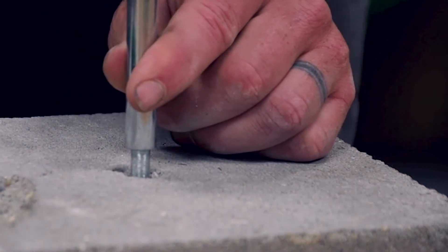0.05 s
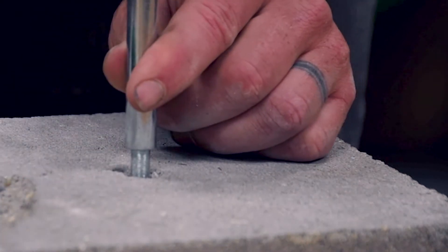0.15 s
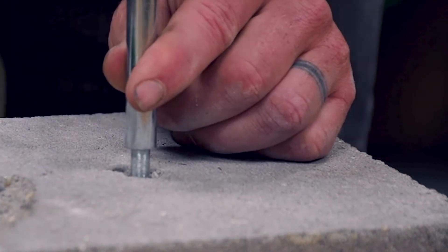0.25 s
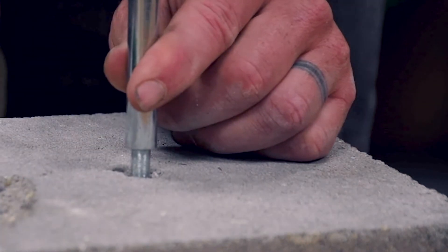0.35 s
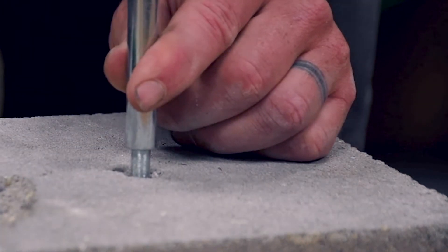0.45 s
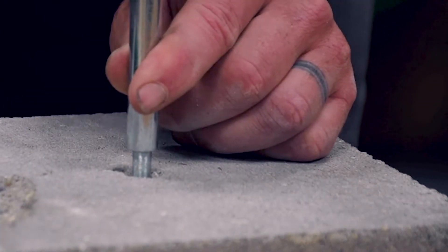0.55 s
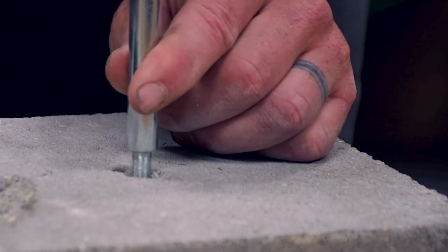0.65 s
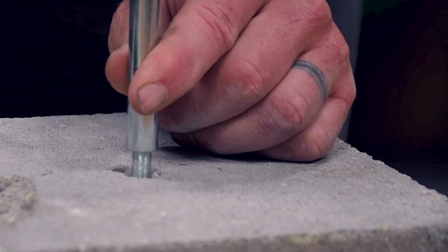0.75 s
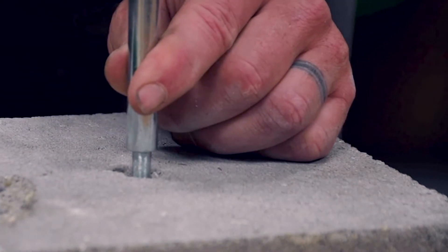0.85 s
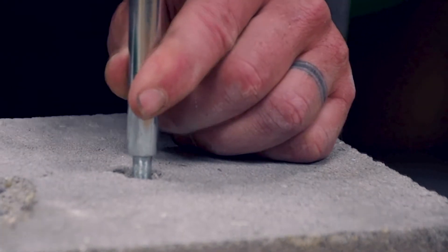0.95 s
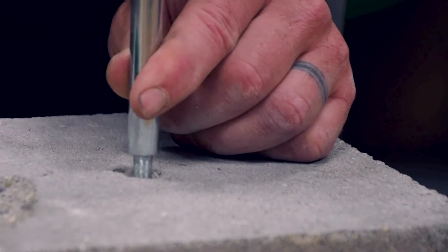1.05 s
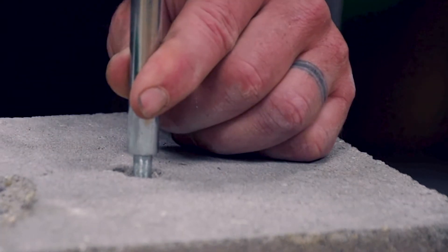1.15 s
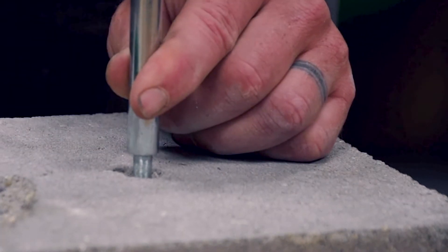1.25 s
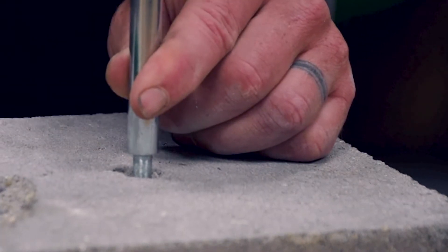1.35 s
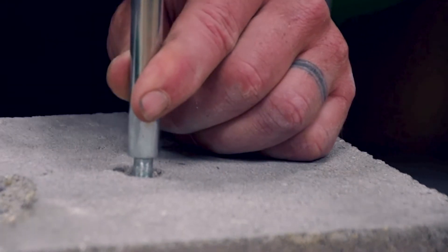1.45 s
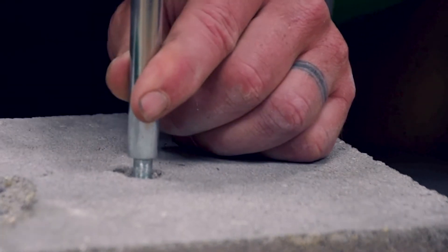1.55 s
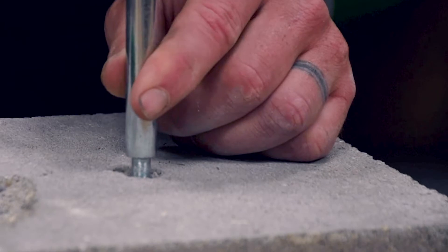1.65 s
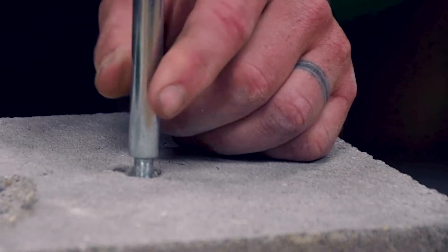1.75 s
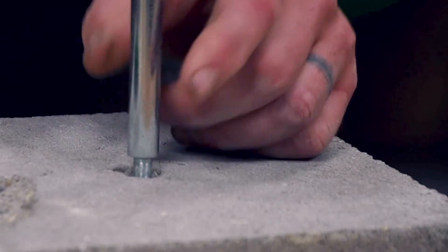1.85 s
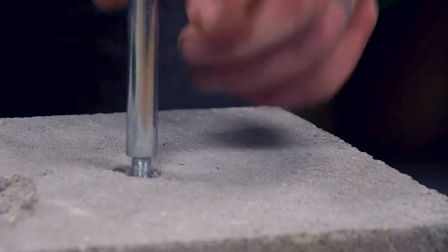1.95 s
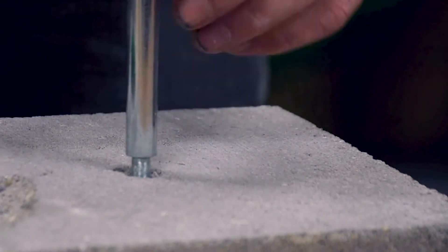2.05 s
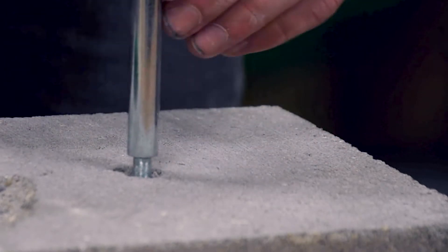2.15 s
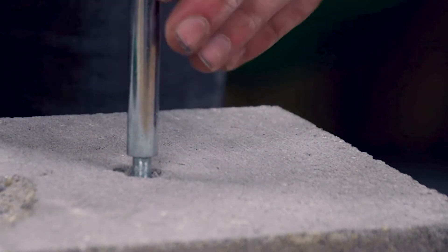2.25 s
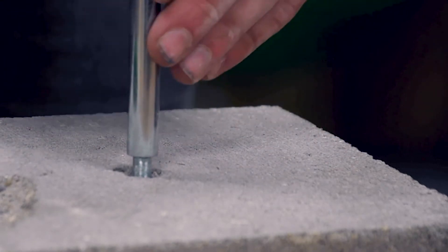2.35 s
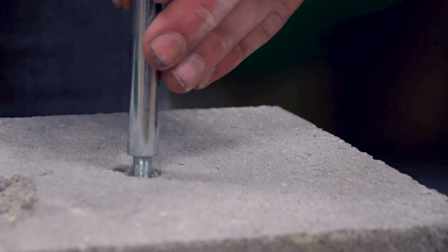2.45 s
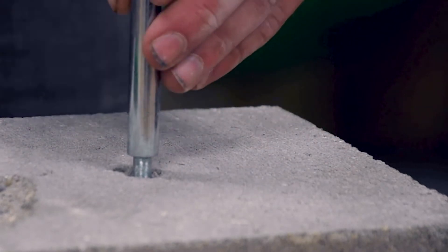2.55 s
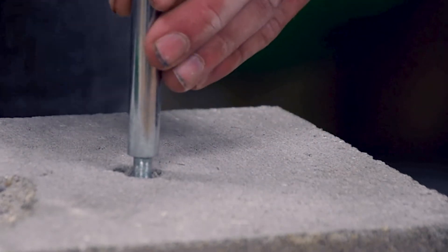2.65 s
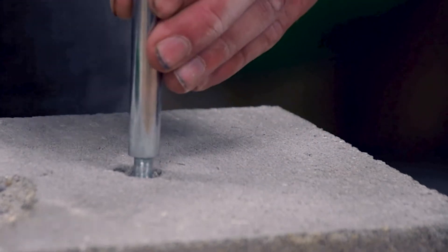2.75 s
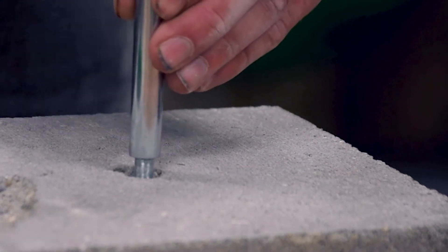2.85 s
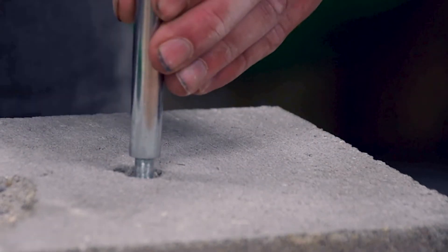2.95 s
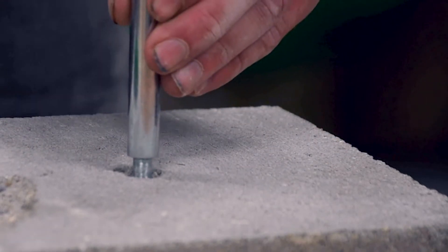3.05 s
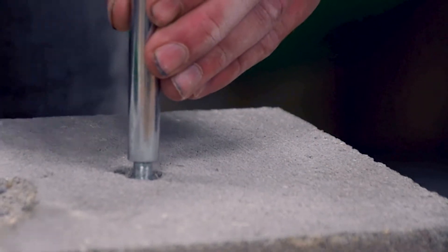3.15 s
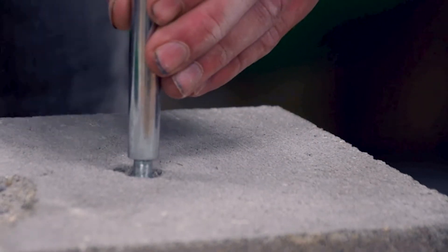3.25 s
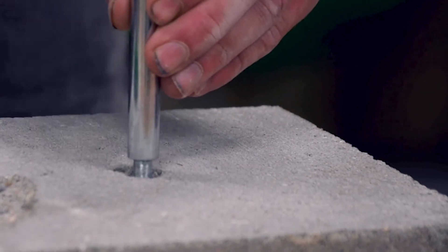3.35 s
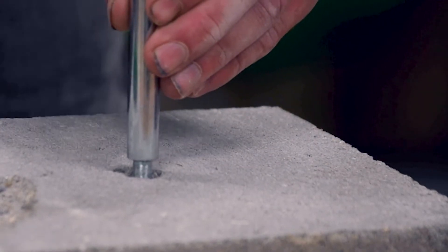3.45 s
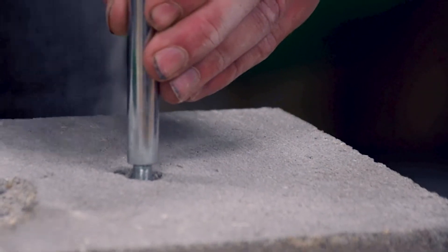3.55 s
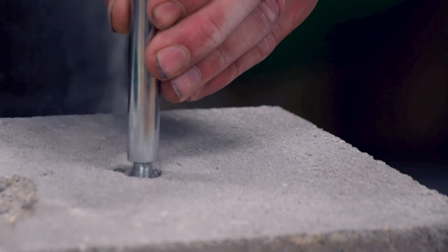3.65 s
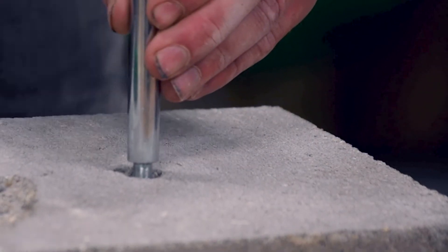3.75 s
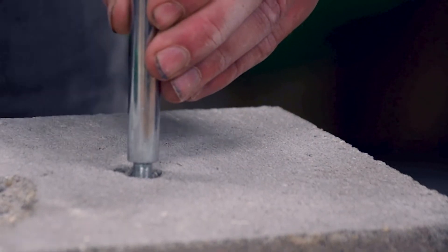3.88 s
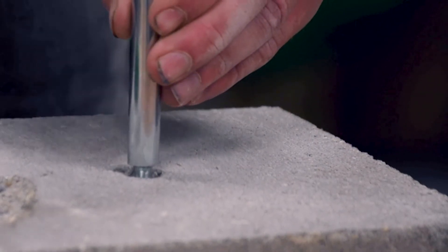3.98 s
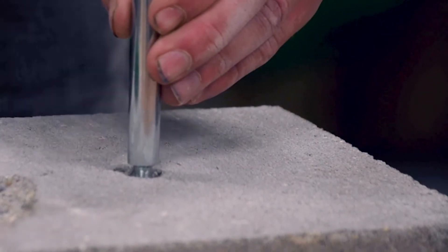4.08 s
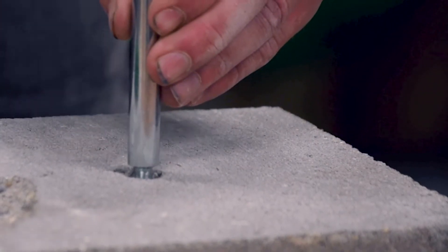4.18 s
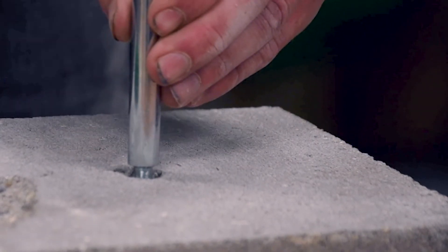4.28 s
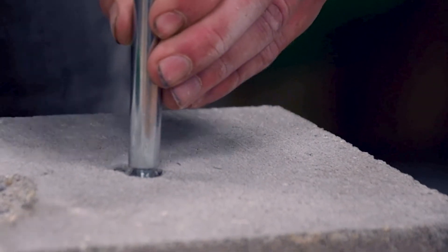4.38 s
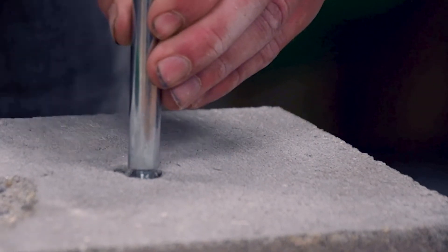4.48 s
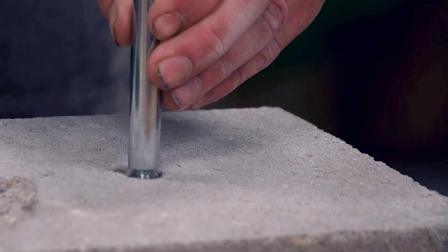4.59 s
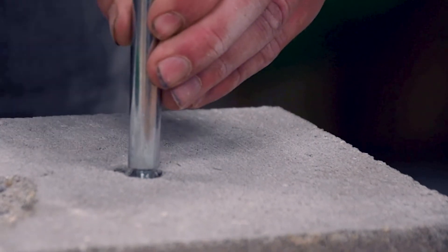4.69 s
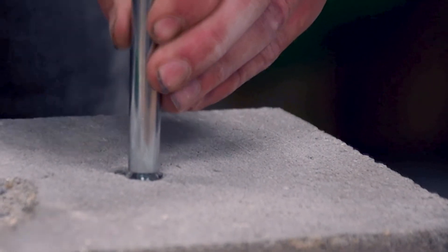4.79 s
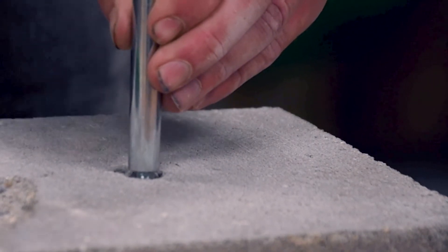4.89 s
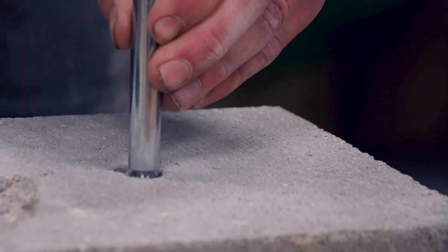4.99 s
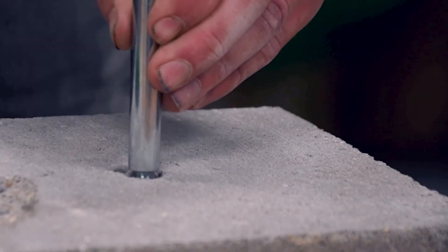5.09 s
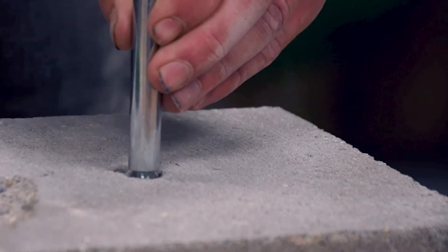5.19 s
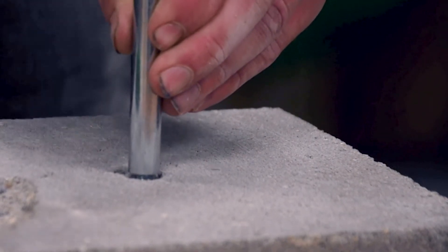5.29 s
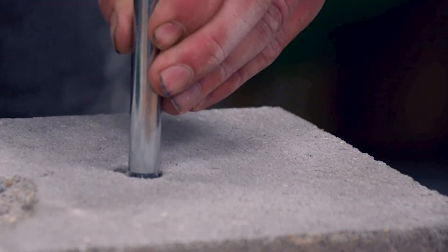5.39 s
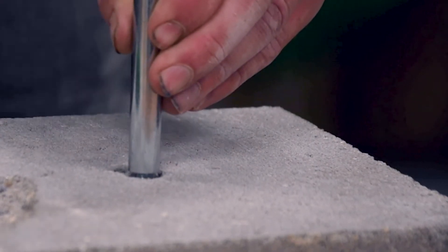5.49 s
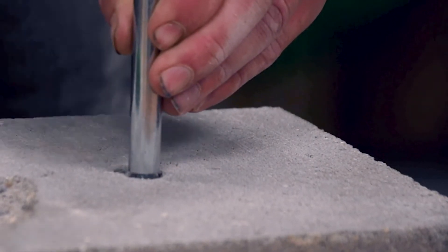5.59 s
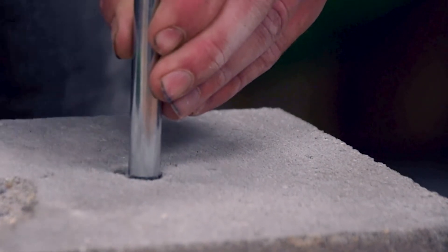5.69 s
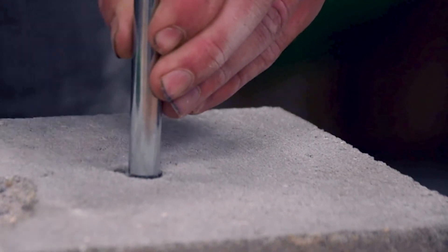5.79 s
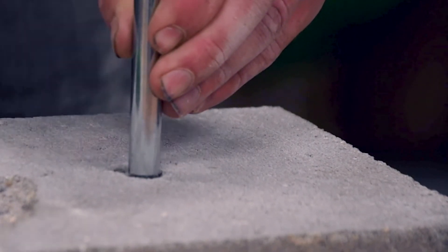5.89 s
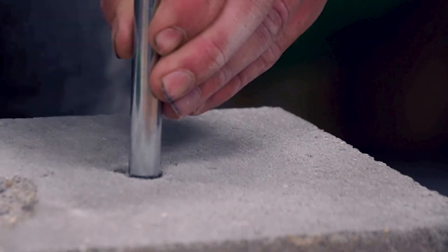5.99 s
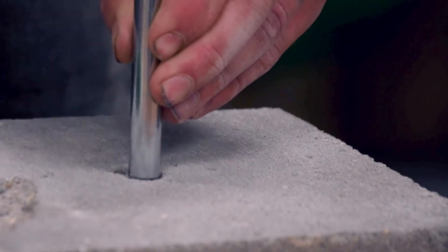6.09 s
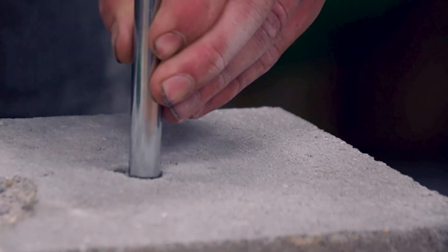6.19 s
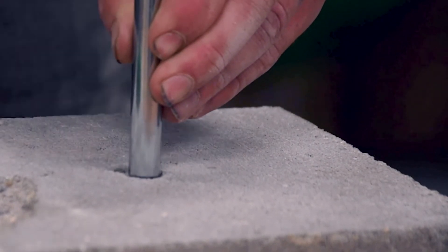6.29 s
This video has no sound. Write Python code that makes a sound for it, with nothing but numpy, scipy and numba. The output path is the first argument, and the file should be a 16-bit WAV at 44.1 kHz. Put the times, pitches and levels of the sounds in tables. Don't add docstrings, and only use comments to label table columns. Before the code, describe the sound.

A quiet workshop with low ventilation rumble and slight hiss; a sleeve rustles softly at the start. At 0.55 s a hammer taps a steel rod lightly, thin and clinking, then strikes more firmly at 0.99 and 1.43 s. Each blow is an instant broadband crack with a short, damped steel ring around 5 to 6 kHz, plus a woody-dull thud of concrete and bench, fading into a half-second room tail. From 1.75 to 2.6 s the hand shifts: faint cloth rustle, tiny high squeaks of fingers on metal, a clear small tick at 2.45 s. Hammering resumes at 2.75 s with a slightly off-centre, clankier blow, then continues at 3.18, 3.58, 4.0, 4.38, 4.82, 5.24, 5.64 and 6.05 s, strong and even. From 4.8 s blows sound tighter and more solid as the anchor beds in. Close stereo microphones, peaks flattened by limiting; the last echo dies away.

```python
import sys
import numpy as np
from scipy import signal
from scipy.fft import rfft, irfft, next_fast_len
from scipy.io import wavfile
from scipy.ndimage import uniform_filter1d, map_coordinates
from numba import njit

SR = 44100
rng = np.random.default_rng(int(sys.argv[2]) if len(sys.argv) > 2 else 0)


def inscribe(sig):
    pcm = np.round(np.clip(np.atleast_2d(sig).T, -1, 1) * 32767)
    wavfile.write(sys.argv[1], SR, pcm.astype(np.int16))


def rack_gain(trim_db):
    fader = np.asarray(trim_db, float)
    return 10 ** (fader / 20)


N = 279094

# start in seconds, strength in dB over the limiter ceiling, drive from -1 (tap)
BLOWS = [(0.5459, 13, -0.92, -0.44, 0.13), (0.9894, 16, -0.15, -0.069, 0.56),
         (1.4294, 19.5, 0.077, -0.084, 0.63), (2.7538, 15, -0.13, 1.0, 0.15),
         (3.1827, 17.5, 0.48, 0.04, 0.7), (3.5816, 20.5, 0.26, -0.13, 0.58), (3.995, 21, 0.15, -0.34, 0.5),
         (4.3777, 19, 0.41, -0.068, 0.39), (4.8247, 19.5, 0.071, -0.16, -0.96),
         (5.2426, 22, -0.056, -0.21, -0.95), (5.6449, 22, 0.16, 0.026, -0.73),
         (6.0459, 21, 0.26, 0.087, -0.74)]
# centre in Hz, width in Hz.
STEEL_MODES = [(2970, 390), (5068, 180), (5365, 144), (6670, 130), (7900, 525), (8450, 790), (9620, 580),
               (11700, 370), (12200, 60), (13700, 60),
               (1858, 190), (3460, 200), (4220, 890), (6100, 570), (7020, 170), (8940, 400), (5440, 370)]
# level in dB, dB per drive, dB per aim, dB per play.
STEEL_SHARES = [(-22.0, -0.5, 5.5, 6), (-14.0, 10, -13, -0.5), (-11.5, 4.5, 8.5, -10), (-15, -2.5, 9.5, -2),
                (-17, 3.5, 2, 13), (-13, -0.5, -4.5, 2), (-20, -5, 9, 0), (-21.5, -1.5, -3.5, 1),
                (-26, 8.5, -8, 0.5), (-34.5, 1.5, 8.5, -4)]
# level in dB, dB per drive, dB per aim, dB per play.
MORE_STEEL_SHARES = [(-28, 7, 4, -2), (-25.0, 4.0, 3, 2.5), (-25.5, -1.5, 5.5, 4), (-20.5, -2, 6.5, 0.5),
                     (-22.0, -4.5, 6, 0.5), (-26, 5.5, 1.5, -0.5), (-19.5, 0.5, 3, 3.5)]
# level in dB, dB per drive, dB per aim, dB per play.
PART_SHARES = [
    (-10.5, 9.5, 4, -2.5),
    (-26.0, 5.5, 0.5, -2.5),
    (-32.5, 13.5, -2.5, 0),
    (-44.5, 11.5, -1, -3),
    (-27.5, -2.5, -4, 7.0),
    (-20.5, 17, 5, -5.5),
    (-32, 7, -3.5, 0.0),
    (-25, -0.5, 9, 3),
    (-17, -3, 1, 4.5),
]
# frequency in Hz, level in dB.
THUD = [(25, -37.5), (70, -20), (110, -4), (200, -8.5), (350, 3.5), (600, -1), (900, -10.5), (1400, -25),
        (3000, -37.5)]
# frequency in Hz, level in dB.
KNOCK = [(400, -30.5), (750, 1), (1200, -5), (1700, -13.5), (3000, -42)]
# frequency in Hz, level in dB.
CRACK = [(500, 0), (1200, -0.5), (2300, -0.5), (3500, -1.5), (5000, 6.5), (7000, -2), (9000, -6),
         (10200, -27)]
# frequency in Hz, level in dB.
SHEEN = [(9000, -54), (10000, -5), (12400, 8.5), (13000, -36)]
# frequency in Hz, level in dB.
AIR = [(12000, -31.5), (12800, 1), (14500, 8), (15700, 3), (16900, -21.5)]
# centre in Hz, width in Hz.
CONTACT_MODES = [
    (13900, 3200),
    (4100, 830),
    (10900, 590),
]
HEAD_HZ = [5072, 5361, 6660]
# t60 in seconds, level in dB against the damped rod mode.
HEAD_DECAY = [(0.34, -56), (0.38, -57), (0.35, -55.5)]
BENCH_HZ = [120.2, 166, 184, 206, 252, 273, 332.5, 380, 489.3, 550, 610, 699.5, 735, 806.5, 886, 1004]
# level in dB, t60 in seconds, beat of the close twin in Hz.
BENCH_DECAY = [(-3, 0.84, 1.65), (0.5, 0.43, .3), (-6.5, 0.56, 0.23), (-3.5, 0.66, 0.58), (-3, 0.49, .3),
               (-13.5, 0.3, .3), (-0.5, 0.47, 0.32), (4, 0.52, 0.46), (-4.5, 0.85, 1.44),
               (-0.5, 0.56, 0.42), (-10.5, 0.49, 0.41), (-8.5, 0.51, 0.48), (-4, 0.46, .3), (-9, 0.47, .3),
               (-22.5, 0.53, .3), (-11, 0.43, .3)]
# frequency in Hz, t60 in seconds.
SHOP_T60 = [(60, 0.21), (150, 0.6), (400, 0.6), (1000, 0.43), (2500, 0.38), (5000, 0.33), (8500, 0.3),
            (12000, 0.24), (15000, 0.28)]
# frequency in Hz, left-right correlation.
ALIKE = [(30, 0.46), (70, 1), (130, 1), (290, 0.93), (640, .7), (1400, 0.16), (3100, -0.17), (6800, 0.034),
         (15000, -0.076)]
# frequency in Hz, left minus right in dB.
LEAN = [(40, 3), (200, -2.5), (600, -1.5), (1600, -2.5), (4500, -1.1), (9000, -3), (15000, -4)]
# time in seconds, then the level in dB of each singing mode.
SLIDES = [
    (1.83, -58, -88, -69),
    (2.0, -97, -80, -100),
    (2.42, -70, -58, -75),
    (2.54, -67, -67, -95),
]
# centre in Hz, width in Hz.
SINGING_MODES = [(5950, 120), (7680, 50), (11810, 50)]
# time in seconds, level in dB.
TICKS = [
    (2.0, -61.5),
    (2.452, -43.5),
    (3.97, -59),
    (4.311, -49),
]
# centre in Hz, width in Hz, level in dB.
SEAT_MODES = [(2600, 900, -13), (3700, 710, -1), (4700, 500, 3), (5730, 670, -2), (7800, 2800, -8)]
# start in seconds, end in seconds, level in dB.
ARM_MOVES = [
    (-0.05, 0.195, -69),
    (0.45, 0.54, -71),
    (1.75, 2.083, -68),
    (2.387, 2.601, -74),
]
# frequency in Hz, level in dB.
CLOTH = [(1500, -14), (2300, -7.5), (3300, -14), (4600, -4), (6800, -9.5), (8900, -5.5), (10500, -16),
         (12000, -27.5)]
# frequency in Hz, level in dB per Hz.
VENT = [(12, -78.5), (20, -49), (60, -14.5), (92, -21), (108, -16.5), (128, -6), (252, -22), (290, -20),
        (456, -26), (1120, -33.5), (1220, -33), (1670, -38), (15000, -55.5), (16800, -76)]

CEILING_DB = -17


def unit(x):
    return x / np.sqrt(np.mean(x ** 2) + 1e-20)


def along(points, hz):
    f, v = np.transpose(points)
    return np.interp(np.log(hz + 1), np.log(f + 1), v)


def filtered(x, response):
    m = next_fast_len(x.shape[-1] + 8192)
    return irfft(rfft(x, m) * response(np.fft.rfftfreq(m, 1 / SR)), m)[..., :x.shape[-1]]


def resonance(hz, centre_hz, width_hz):
    return 1j * hz * width_hz / (centre_hz ** 2 - hz ** 2 + 1j * hz * width_hz)


def causal(gain):
    cepstrum = irfft(np.log(gain + 1e-6))
    half = len(cepstrum) // 2
    cepstrum[1:half] *= 2
    cepstrum[half + 1:] = 0
    return np.exp(rfft(cepstrum))


def stereo(pair):
    def mid_side(hz):
        angle = np.arccos(np.clip(along(ALIKE, hz), -1, 1)) / 2
        return np.array([np.cos(angle), np.sin(angle)])
    mid, side = filtered(pair, mid_side)
    left_right = np.array([mid + side, mid - side])
    return filtered(left_right, lambda hz: rack_gain(np.outer([.5, -.5], along(LEAN, hz))))


def shop(direct_db, fill_s):
    hz, t, z = signal.stft(rng.standard_normal((2, SR)), SR, nperseg=256)
    decay = rack_gain(-60 * t / along(SHOP_T60, hz)[:, None])
    echoes = signal.istft(z * decay, SR, nperseg=256)[1][:, :SR]
    echoes = stereo(echoes) * (1 - np.exp(-np.arange(SR) / SR / fill_s))
    echoes /= np.linalg.norm(echoes[0])
    echoes[:, 0] += rack_gain(direct_db)
    return echoes


def swell(start_s, end_s, db, rise, fall):
    t = np.arange(N) / SR
    return db - rise * np.maximum(start_s - t, 0) - fall * np.maximum(t - end_s, 0)


def shares(table, stroke):
    return np.array(table) @ [1, *stroke]


def hammer():
    out = np.zeros((2, N + SR))
    standing, same_room = block(), shop(direct_db=-21, fill_s=0.013)
    m = next_fast_len(SR + 8192)
    hz = np.fft.rfftfreq(m, 1 / SR)
    for s, strength_db, *stroke in BLOWS:
        steel_db, more_steel_db = shares(STEEL_SHARES, stroke), shares(MORE_STEEL_SHARES, stroke)
        thud_db, crack_db, sheen_db, air_db, thump_db, knock_db, *contact_db = shares(PART_SHARES, stroke)
        metal = steel(hz, [*steel_db, *more_steel_db], [crack_db, sheen_db, air_db])
        metal = metal * rfft(shop(direct_db=-15.5, fill_s=0.00096), m)

        push = causal(np.hypot(rack_gain(thud_db - 2.5 + along(THUD, hz)), rack_gain(knock_db + along(KNOCK, hz))))
        seating_db_per_octave = 0.54 * (knock_db - thud_db + 10.5)
        lift = causal(rack_gain(seating_db_per_octave * np.log2(np.clip(hz, 150, 700) / 400)))
        own_room = shop(direct_db=-36.5, fill_s=0.016)
        push = push * lift * rfft(0.51 * same_room + 0.61 * own_room, m)
        drone = rack_gain(thud_db - 6) * rfft(standing, m) * lift

        blow = irfft(metal + push + contact(hz, contact_db, m) + drone, m)[:, :SR]
        blow += thump(thump_db)
        blow += head(steel_db[1:4])
        blow /= np.sqrt(np.mean(blow[:, :SR // 20] ** 2))
        out[:, round(s * SR):][:, :SR] += rack_gain(CEILING_DB + strength_db) * blow
    return out[:, :N]


def steel(hz, modes_db, broad_db):
    broad = sum(rack_gain(db + along(shape, hz)) ** 2 for db, shape in zip(broad_db, [CRACK, SHEEN, AIR]))
    ring = sum(rack_gain(db + 3.5) ** 2 * np.abs(resonance(hz, c, w)) ** 3.24
               for db, (c, w) in zip(modes_db, STEEL_MODES))
    minor = rack_gain(2.24 * map_coordinates(rng.standard_normal(120), [hz / 190]))
    return causal(np.sqrt(broad + ring) * minor)


def contact(hz, levels_db, m):
    faces = sum(rack_gain(db - 13.5) * resonance(hz, c, w) ** 2 for db, (c, w) in zip(levels_db, CONTACT_MODES))
    chatter = rng.standard_normal((2, 200)) * rack_gain(-60 * np.arange(200) / SR / .007) / 2.4
    return faces * rfft(chatter, m)


def head(levels_db):
    t = np.arange(SR) / SR
    places = [np.arange(6)[:, None] + 0 * t, 30 * t + np.zeros((6, 1))]
    waver = map_coordinates(rng.standard_normal((6, 40)), places).reshape(3, 2, -1)
    return sum(rack_gain(level + db - 60 * t / t60 + 5.8 * w) * np.sin(2 * np.pi * hz * t + 0.99 * w[::-1])
               for level, hz, (t60, db), w in zip(levels_db, HEAD_HZ, HEAD_DECAY, waver))


def thump(db):
    t = np.arange(SR) / SR
    return rack_gain(db - 24 - 60 * t / 0.017) * np.sin(2 * np.pi * 95 * t - 1.2) * (1 - np.exp(-t / 0.00052))


def block():
    t = np.arange(SR) / SR
    count = len(BENCH_HZ)
    phase = rng.uniform(0, 2 * np.pi, (count, 1)) + rng.normal(0, 0.36, (count, 2))
    tones = 0
    for hz, (db, t60, beat_hz), p in zip(BENCH_HZ, BENCH_DECAY, phase):
        beating = rack_gain(db - 60 * t / t60) * np.cos(np.pi * beat_hz * t)
        tones = tones + beating * np.sin(2 * np.pi * hz * t + p[:, None])
    return rack_gain(-47.5) * tones * (1 - np.exp(-t / 0.0062))


def fingers():
    strokes_db = np.max([swell(s, s, np.c_[dbs], rise=490, fall=270) for s, *dbs in SLIDES], 0)
    sing = 0
    for db, (c, w) in zip(strokes_db, SINGING_MODES):
        noise = rng.standard_normal((2, N))
        sing = sing + rack_gain(db) * unit(filtered(noise, lambda hz: resonance(hz, c, w) ** 2))
    taps = np.zeros(N)
    for s, db in TICKS:
        taps[round(s * SR)] = rack_gain(db + 16.5)
    tick = filtered(taps, lambda hz: sum((-1) ** k * rack_gain(db) * resonance(hz, c, w) ** 2
                                         for k, (c, w, db) in enumerate(SEAT_MODES)))
    return sing + signal.fftconvolve(tick[None], shop(direct_db=10, fill_s=.004), axes=1)[:, :N]


def sleeve():
    level_db = np.max([swell(*move, rise=300, fall=70) for move in ARM_MOVES], 0)
    rustle = filtered(rng.standard_normal((2, N)), lambda hz: rack_gain(along(CLOTH, hz)))
    return rack_gain(level_db + 3.5) * unit(rustle)


def vent():
    z = signal.stft(rng.standard_normal((2, N)), nperseg=1024)[2]
    patches = uniform_filter1d(uniform_filter1d(rng.standard_normal(z.shape[1:]), 6, 0), 6, 1)
    pair = signal.istft(z * rack_gain(1.1 * unit(patches)), nperseg=1024)[1][:, :N]
    return rack_gain(-49) * unit(stereo(filtered(pair, lambda hz: rack_gain(along(VENT, hz)))))


def scene():
    return hammer() + fingers() + sleeve() + vent()


@njit
def follow(level, rise, fall):
    out = np.empty_like(level)
    held = 0.
    for i in range(len(level)):
        held += (rise if level[i] > held else fall) * (level[i] - held)
        out[i] = held
    return out


def low_pass(x):
    return signal.sosfilt(signal.butter(12, 16920, fs=SR, output="sos"), x)


def record(dry):
    peak = np.roll(np.abs(dry).max(0), -14)
    attack_s, release_s = .00006, .006
    held = follow(peak, 1 - np.exp(-1 / (attack_s * SR)), 1 - np.exp(-1 / (release_s * SR)))
    over = held / rack_gain(CEILING_DB + 6.5)
    limited = dry * (1 + over ** 3) ** (-.93 / 3)
    mix = limited / (1 + np.abs(limited / .38) ** 6) ** (1 / 6)
    return low_pass(mix)


dry = scene()
out = record(dry)
inscribe(out)
```